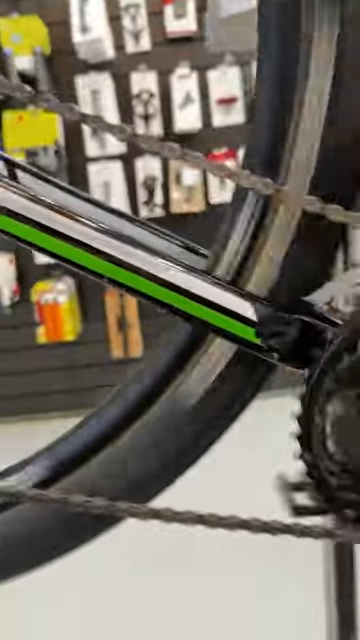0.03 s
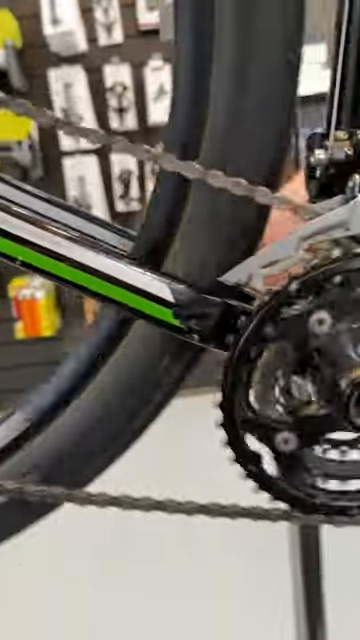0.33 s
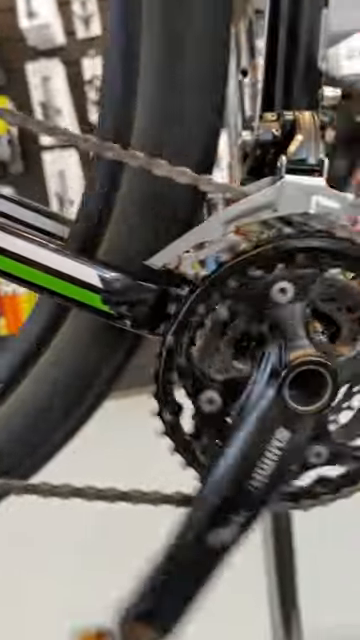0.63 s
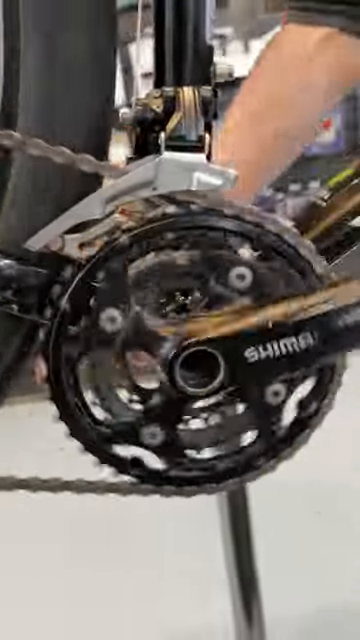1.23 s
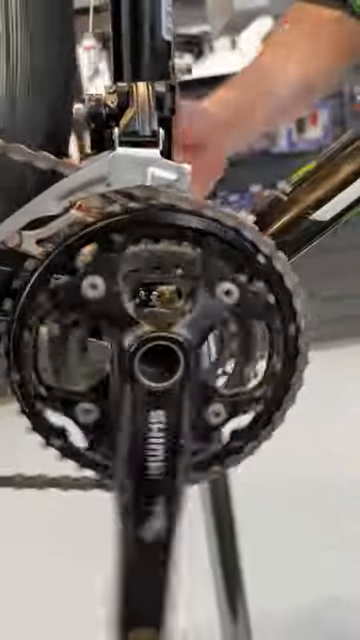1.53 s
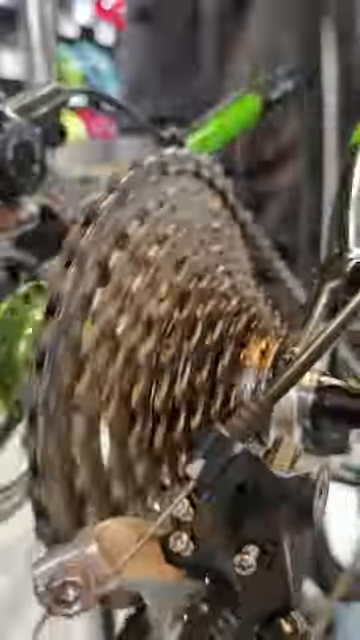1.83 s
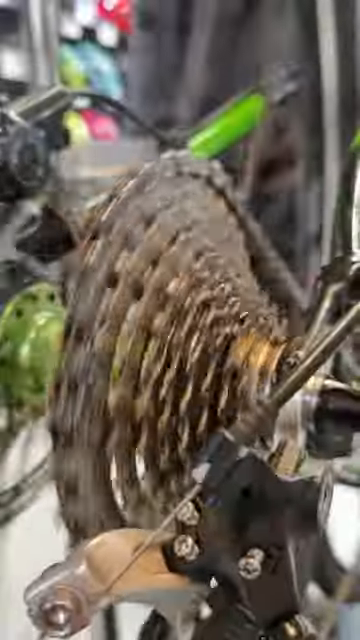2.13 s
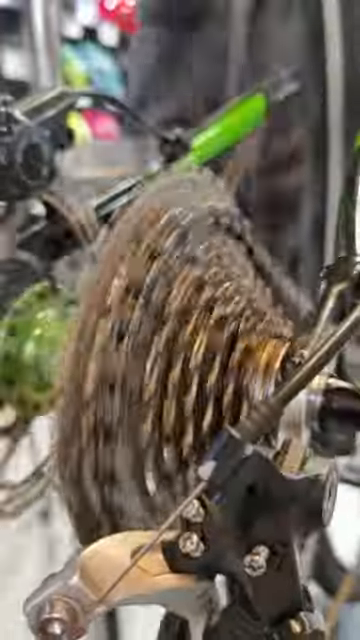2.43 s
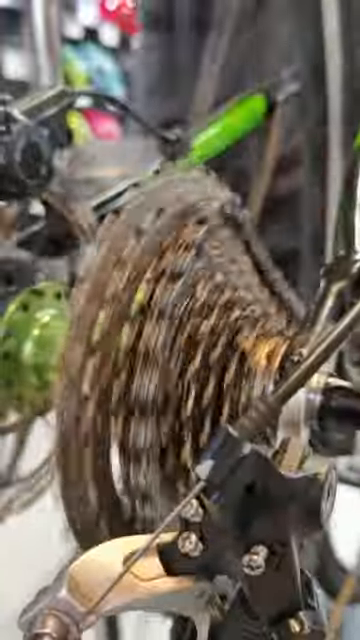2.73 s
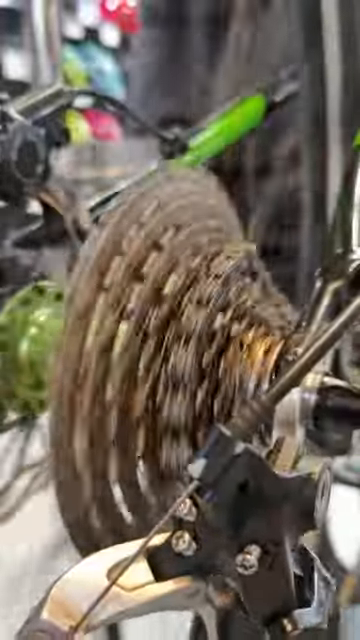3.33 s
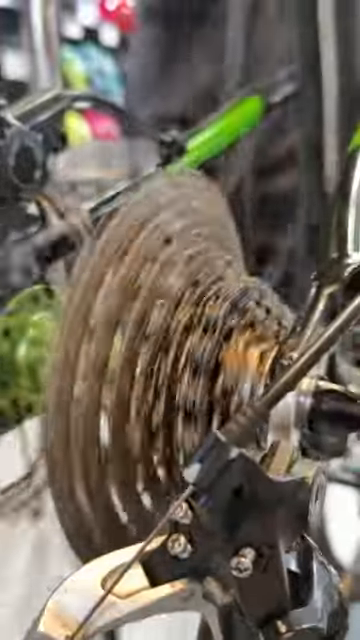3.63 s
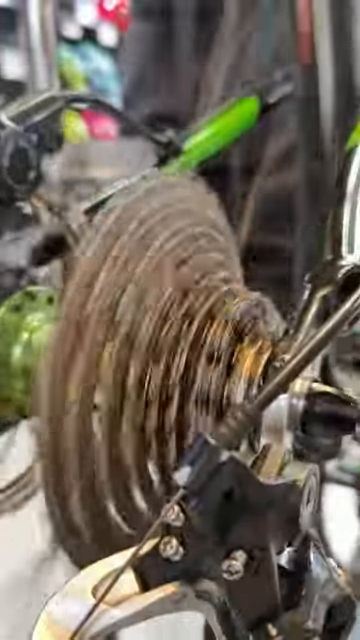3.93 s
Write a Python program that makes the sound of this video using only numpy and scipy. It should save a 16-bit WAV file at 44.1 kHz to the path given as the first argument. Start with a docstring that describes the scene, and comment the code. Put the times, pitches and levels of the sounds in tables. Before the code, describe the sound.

A bicycle chain runs close to the microphones in a quiet workshop. Until about 1.8 seconds its links tick rapidly and evenly onto the chainring, rattling over a low hum. The sound then switches to the rear sprockets, where the chain whirs, scrapes and clacks irregularly through gear shifts. Frame thuds and briefly ringing derailleur clangs join in, strongest around 2.9, 3.4 and 3.9 to 4 seconds.

```python
"""A workshop, with a bicycle pedalled on a repair stand and a stereo pair close to the drive.
Beside the chainring, links tick evenly onto the teeth and their rollers rattle over a low hum.
Then the microphones are at the cassette: the chain whirs, scrapes and clacks from sprocket to sprocket,
and each time it drops into mesh the frame thuds and the derailleur cage clangs and rings."""
import sys
import numpy as np
from scipy import signal
from scipy.fft import rfft, irfft
from scipy.io import wavfile
from scipy.ndimage import uniform_filter1d, map_coordinates

SR = 44100
rng = np.random.default_rng(int(sys.argv[2]) if len(sys.argv) > 2 else 0)


def bounce(signal):
    """Save signal as a 16-bit WAV file at the path given by the first command-line argument."""
    frames = np.transpose(np.atleast_2d(signal))
    limited = np.clip(frames, -1, 1)
    pcm = np.round(limited * 32767).astype(np.int16)
    wavfile.write(sys.argv[1], SR, pcm)


N = 176400
T = np.arange(N) / SR
AT_CASSETTE_S = 1.82  # the microphones change from chainring to cassette
SCRAPE_S, SCRAPE_DB = 0.0056, -8  # a plate slides before it strikes
STEEL_LOW_HZ, TOP_HZ = 2532, 15900

# Stiff links snap onto the chainring. Each row: time in seconds, extra level in dB.
STIFF_LINKS = [(.157, 10), (.277, 14), (.302, 9), (.63, 10), (1.395, 7)]
# How hard the links bite onto the chainring. Each row: time in seconds, gain in dB.
LINK_BITE = [(0, 3.5), (.3, -5.5), (.4, -1), (.82, 1.5), (.95, -2.5), (1.8, -3)]
# Pings of the rollers. Each row: pitch in Hz, starting level in dB, drift in dB per second.
ROLLER_PINGS = [(3230, -62, 7.5), (4170, -46.5, -2.5), (6850, -41, -7), (7300, -42, -4)]
# The chain slams onto a sprocket.
# Each row: time in seconds, level in dB, decay in seconds, brightness in dB per octave.
SHIFT_CLACKS = [(1.9343, -18, 0.0097, -1.5), (2.077, -19.5, 0.0026, -3.5), (2.2107, -18.5, 0.01, -2.5),
                (2.354, -17.5, 0.0032, -2), (2.379, -18.5, 0.014, 2), (2.483, -19.5, 0.0053, -3),
                (2.609, -20, 0.0088, -2), (2.763, -20.5, 0.0055, -1), (2.779, -15, 0.0023, 3.5),
                (2.861, -23, 0.012, -2.5), (2.917, -21.5, 0.0048, -8.5), (3.067, -23, 0.0043, -3.5),
                (3.2266, -24, 0.0036, -3), (3.370, -23, 0.0046, -2),  (3.3902, -13.5, 0.002, 3),
                (3.532, -25, 0.002, 0), (3.632, -27, 0.0057, -1), (3.677, -27, 0.008, 0),
                (3.803, -18, 0.0027, 0)]
# A plate only clips the tip of a tooth. Each row: time in seconds, level in dB.
TOOTH_TICKS = [(2.0245, -26.5), (2.106, -26), (2.2238, -14), (2.461, -18.5), (2.598, -21.5), (2.6503, -22),
               (2.686, -23.5), (3.127, -21.5), (3.233, -25), (3.595, -26.5), (3.6955, -20), (3.899, -21)]
# The chain drops into mesh. Each row: time in seconds, frame thud in dB, its pitch in Hz, clang in dB.
MESH_KNOCKS = [(1.94, -25.5, 255.3, -38), (2.076, -31, 190, -38), (2.352, -25.5, 190.2, -35.5),
               (2.417, -23, 251.3, -52), (2.779, -25, 260, -22), (2.882, -18.5, 270, -48),
               (2.917, -20, 320, -11), (2.947, -16.5, 306, -19.5), (2.971, -18.5, 330, -34.5),
               (3.39, -20.5, 269.6, -14.5), (3.769, -33.5, 346, -28.5), (3.902, -15, 264.7, -26),
               (3.991, -17.5, 256, -10)]
# Parts that ring on. Each row: pitch in Hz, level in dB, seconds to fall by 60 dB.
FRAME_MODES = [(150, -25.5, 0.98), (314.5, -17, 0.38), (353.8, -18.5, 0.44), (630.7, -18, 0.14)]
CAGE_MODES = [(1422, -26, 0.32), (2254, -12.5, 0.1), (2370, -17, 0.12), (2960, -18.5, 0.078)]
SPROCKET_MODES = [(6270, -35.5, 0.19)]
# The chain running over the cassette. Each row: time in seconds, level in dB.
WHIR_LEVEL = [(1.82, -38), (2.17, -43.5), (2.44, -35.5), (2.7, -40), (2.92, -35), (3.2, -35.5),
              (3.8, -40.5), (4, -31.5)]
# Hollow resonances of the frame. Each row: centre in Hz, width in Hz, gain in dB.
FRAME_DRONES = [(351.3, 27, -5), (737, 35, -16.5)]
# Hum of the turning drive. Each row: time in seconds, pitch in Hz, level in dB.
DRIVE_HUM = [(0, 70.57, -38), (0.701, 75.05, -38.5), (.88, 71.6, -46.5), (1.8, 73.4, -51.5),
             (3.098, 83.32, -42.5), (4, 77.5, -53)]

# Tone colours at the microphones. Each row: frequency in Hz, relative level in dB.
LINK_COLOUR = [(4200, -17), (5200, -12.5), (6900, -8), (8300, -8.5), (9700, -6), (14000, -22)]  # link on chainring tooth
ROLLER_COLOUR = [(1100, -4.5), (1410, 5.5), (1850, -7.5), (2450, 4), (4300, -6), (5150, -18), (6900, -2),
                 (16000, -16.5)]  # loose rollers
SNAP_COLOUR = [(3500, -10), (5200, -6), (7200, 0), (11000, 0), (16000, -4)]  # chain on sprocket tooth
BODY_COLOUR = [(200, 12), (1050, -4), (1500, 3), (3500, 10), (9000, -7)]  # sprocket body
CLANG_COLOUR = [(1450, -1), (1850, -4), (2300, 12.5), (2850, 13), (3900, -14.5)]  # derailleur cage
JOLT_COLOUR = [(320, -14.5), (520, 1), (700, 1.5), (1300, -34)]  # jolted derailleur
WHIR_COLOUR = [(80, -16), (270, 7), (460, -6.5), (700, -5.5), (1050, -22), (2450, -9.5), (5000, -22.5),
               (15000, -19.5)]  # running chain
ROOM_TONE_COLOUR = [(20, -1), (77, -15), (873, -28.5), (7520, -34.5), (16000, -67)]  # workshop
RUMBLE_COLOUR = [(60, -4.5), (300, -9), (700, -45.5)]  # repair stand
# The workshop's reverberation. Each row: frequency in Hz, seconds to fall by 60 dB.
ROOM_DECAY = [(500, 0.23), (7000, 0.41), (16000, 0.16)]
# How alike the two microphones hear diffuse sound. Each row: frequency in Hz, correlation from 0 to 1.
PAIR_LIKENESS = [(300, 0.95), (1200, 0.4), (2500, 0.13), (5000, 0.033)]


def chainring(links_per_s=41.8, speedup_per_s2=1.3, lead_s=.0007, tick_db=-39.5, tick_decay_s=.0013):
    """Close by the chainring, each link ticks onto a tooth and its roller pings and rattles."""
    link = np.arange(int(AT_CASSETTE_S * (links_per_s + speedup_per_s2 * AT_CASSETTE_S / 2)))
    link_rate = np.sqrt(links_per_s ** 2 + 2 * speedup_per_s2 * link)
    times = .0135 + (link_rate - links_per_s) / speedup_per_s2
    force_db = 2.2 * rng.uniform(-1, 1, len(link))
    for s, db in STIFF_LINKS:
        force_db[np.argmin(abs(times - s))] = db
    times += .0006 * rng.standard_normal(len(link))  # play in the chain
    force_db += np.interp(times, *np.transpose(LINK_BITE))
    ticks = strikes([(s, tick_db + db, tick_decay_s) for s, db in zip(times, force_db)], lead_s)
    pings = roller_pings(times, force_db, lead_s)
    rattle = roller_rattle(times, lead_s)
    return room(colour(steel(ticks * grit()), LINK_COLOUR) + steel(rattle) + pings)


def roller_pings(times, force_db, rise_s, detune=.012, spread_db=3.5, t60_s=.028):
    """Each struck roller rings briefly, at pitches and levels a little unlike the last."""
    out, t = np.zeros((2, N)), np.arange(SR // 16) / SR
    for s, blow_db in zip(times, force_db):
        modes = [(hz * (1 + detune * rng.standard_normal()),
                  db + drift * s + blow_db + spread_db * rng.standard_normal(), t60_s)
                 for hz, db, drift in ROLLER_PINGS]
        add(out, s, np.array([ring(modes, t), ring(modes, t)]) * (1 - np.exp(-t / rise_s)))
    return out


def roller_rattle(times, lead_s, within_s=.022, spread_db=8, decay_s=.0034):
    """Loose rollers bounce three times after each link; late bounces tend to be softer."""
    bounces = [(s + within_s * delay, spread_db * (strength - delay), decay_s)
               for s in times for delay, strength in rng.random((3, 2))]
    level = amp(-52.5 + 2.5 * T)
    return colour(strikes(bounces, lead_s) * level * noise(), ROLLER_COLOUR)


def shift_clacks(pivot_hz=8500, body_db=-9.5, body_ring_s=.006, size=8192):
    """Close by the cassette, the chain catches on ringing teeth; full blows sound the sprocket body."""
    snaps, grains = np.zeros((2, N)), grit()
    t = (np.arange(size) - size // 8) / SR
    octaves = np.log2(np.clip(np.fft.rfftfreq(size, 1 / SR), STEEL_LOW_HZ, TOP_HZ) / pivot_hz)
    ticks = [(s, db, .001, 1.5) for s, db in TOOTH_TICKS]  # short and bright
    scrape = amp(SCRAPE_DB) * np.exp(-abs(t) / SCRAPE_S)
    first_hit = amp(2) * np.exp(-abs(t) / .0005)
    for s, db, decay_s, tilt in SHIFT_CLACKS + ticks:
        force = np.where(t < 0, scrape, np.exp(-abs(t) / decay_s) + first_hit)
        offset = rng.integers(N - size)
        contact = force * grains[:, offset:offset + size]
        tilted = irfft(rfft(contact) * amp(db + tilt * octaves))
        add(snaps, s + t[0], steel(tilted))
    # Duller blows carry more body.
    blows = [(s, db + body_db - tilt, decay_s + body_ring_s) for s, db, decay_s, tilt in SHIFT_CLACKS]
    body = strikes(blows, SCRAPE_S) * noise()
    return room(colour(snaps, SNAP_COLOUR) + colour(body, BODY_COLOUR))


def mesh_knocks(rise_s=.0026, thud_s=.0069, clang_s=.0033, jolt_s=.011, lead_s=.0028, sings_at_s=2.955):
    """The chain falls into mesh: the frame thuds, the cage clangs, and once a freed sprocket sings."""
    rings, t = np.zeros((2, N)), np.arange(SR // 2) / SR
    attack = 1 - np.exp(-t / rise_s)
    for s, thud_db, hz, clang_db in MESH_KNOCKS:
        thud = 2 * np.sin(2 * np.pi * hz * t) * np.exp(-t / thud_s)
        add(rings, s, amp(thud_db) * attack * (thud + ring(FRAME_MODES, t, phase_scatter=0)))
        cage_centre = ring(CAGE_MODES, t)
        cage_sides = np.array([ring(CAGE_MODES, t), ring(CAGE_MODES, t)])
        add(rings, s, amp(clang_db) * (cage_centre + .5 * cage_sides))
    add(rings, sings_at_s, ring(SPROCKET_MODES, t) * attack)
    clang = strikes([(s, db, clang_s) for s, _, _, db in MESH_KNOCKS], lead_s)
    # The derailleur's jolt follows a blend of the thud and clang levels.
    jolt = strikes([(s, .56 * thud_db + .44 * clang_db - 7, jolt_s)
                    for s, thud_db, _, clang_db in MESH_KNOCKS], lead_s)
    return room(rings + colour(clang * noise(), CLANG_COLOUR) + colour(jolt * noise(), JOLT_COLOUR))


def chain_whir(spread_db=10.5, decay_s=.0031, steady_force=.25):
    """Rollers patter through the jockey wheels and over the cassette, and keep the frame droning."""
    times = T[1:][np.diff(np.floor(drive_cycles())) > 0]  # one roller per cycle
    patter = strikes([(s, spread_db * rng.uniform(-.5, 1), decay_s) for s in times], SCRAPE_S)
    level = amp(np.interp(T, *np.transpose(WHIR_LEVEL))) * (T > AT_CASSETTE_S)
    force = unit(patter + steady_force) * level * noise()
    drone = sum(amp(db) * resonate(force, hz, width_hz) for hz, width_hz, db in FRAME_DRONES)
    return room(colour(force, WHIR_COLOUR) + drone) / np.sqrt(2)


def drive_hum(rough_below_db=-43.5, shudders_per_s=32):
    """The drive shakes frame and stand: a low note and its octave, breaking into rumble when weak."""
    times, _, db = np.transpose(DRIVE_HUM)
    level_db = np.interp(T, times, db)
    rough_share = .076 + .5 * (level_db < rough_below_db)
    phase = 2 * np.pi * drive_cycles()
    out = 0
    for harmonic, gain in [(1, 1), (2, amp(-10 + .5 * T))]:
        shudder = [map_coordinates(points, [T * shudders_per_s], mode="mirror")
                   for points in rng.standard_normal((2, 256))]
        tone = np.sin(harmonic * phase)
        rumble = shudder[0] * tone + shudder[1] * np.cos(harmonic * phase)
        out += gain * (np.sqrt(1 - rough_share) * tone + np.sqrt(rough_share / 2) * rumble)
    return np.sqrt(2) * amp(level_db) * out


def workshop(tone_db=-48, rumble_db=-43.5, fade_db_per_s=7):
    """Behind the bicycle: steady room tone and the fading rumble of the stand."""
    room_tone = amp(tone_db) * colour(noise(), ROOM_TONE_COLOUR)
    rumble = amp(rumble_db - fade_db_per_s * T) * colour(noise(), RUMBLE_COLOUR)
    return room_tone + rumble


def room(x, early_db=-7.5, early_s=.006, tail_db=-7, size=32768):
    """Adds close reflections off the bicycle, then the tail of the workshop."""
    hz, frame_s, spectra = signal.stft(rng.standard_normal((2, size)), SR, nperseg=256)
    decay = amp(-60 * frame_s / at_hz(ROOM_DECAY, hz)[:, None])
    tail = signal.istft(spectra * decay, SR, nperseg=256)[1][:, :size]
    t = np.arange(size) / SR
    early = rng.standard_normal((2, size)) * (rng.random((2, size)) < .02) * np.exp(-t / early_s)
    reflections = (amp(tail_db) * unit(tail) + amp(early_db) * unit(early)) * (t > .002)
    return x + signal.fftconvolve(x, diffuse(reflections) / np.sqrt(size), axes=1)[:, :N]


def drive_cycles():
    """Cycles of the drive's vibration so far."""
    times, hz, _ = np.transpose(DRIVE_HUM)
    return np.cumsum(np.interp(T, times, hz)) / SR


def strikes(blows, lead_s):
    """Contact force of (seconds, dB, decay seconds) blows: a short scrape, the strike, a fast decay."""
    force, t = np.zeros(N), np.arange(-SR // 32, SR // 8) / SR
    scrape = amp(SCRAPE_DB) * np.exp(-abs(t) / lead_s)
    for s, db, decay_s in blows:
        add(force, s + t[0], amp(db) * np.where(t < 0, scrape, np.exp(-abs(t) / decay_s)))
    return force


def grit(lag_s=.00011, likeness=.56, grain_db=-1):
    """Dense tiny steel contacts that reach the left microphone first."""
    left, unrelated, sizes = rng.standard_normal((3, N))
    grains = amp(grain_db * np.clip(unit(uniform_filter1d(sizes, size=14)), -2, 2))
    right = likeness * np.roll(left, round(lag_s * SR)) + np.sqrt(1 - likeness ** 2) * unrelated
    return unit(np.array([left, right]) * grains)


def steel(x, t60_s=.023, ring_db=-1, count=50, size=2048):
    """Many short partials of plates and teeth ring on after each contact."""
    t = np.arange(size) / SR
    hz, phase = rng.uniform(STEEL_LOW_HZ, TOP_HZ, (count, 1)), rng.random((2, count, 1))
    partials = np.sin(2 * np.pi * (hz * t + phase)).sum(1) * amp(-60 * t / t60_s)
    ringing = signal.fftconvolve(x, unit(partials) / np.sqrt(size), axes=1)[:, :x.shape[1]]
    return (x + amp(ring_db) * ringing) / np.hypot(1, amp(ring_db))


def ring(modes, t, phase_scatter=1):
    """Dying partials of one struck part; scattered phases make each blow a little different."""
    return sum(amp(db - 60 * t / t60) * np.sin(2 * np.pi * (hz * t + phase_scatter * rng.random()))
               for hz, db, t60 in modes)


def resonate(x, hz, width_hz):
    """One resonance, with gain to make up for its narrow band."""
    b, a = signal.iirpeak(hz, hz / width_hz, SR)
    return signal.lfilter(b, a, signal.lfilter(b, a, x)) * np.sqrt(SR / width_hz / 2)


def colour(x, spectrum, size=4096):
    """Minimum-phase filter of unit energy with the given spectrum."""
    log_gain = np.log(amp(at_hz(spectrum, abs(np.fft.fftfreq(size, 1 / SR)))))
    taps = np.fft.ifft(np.exp(np.conj(signal.hilbert(log_gain)))).real[:size // 2]
    return signal.oaconvolve(x, taps[None] / np.linalg.norm(taps), axes=1)[:, :N]


def diffuse(x):
    """Makes two unrelated channels alike in the bass, as closely spaced microphones hear them."""
    left, unrelated = rfft(x)
    likeness = at_hz(PAIR_LIKENESS, np.fft.rfftfreq(x.shape[1], 1 / SR))
    return irfft([left, likeness * left + np.sqrt(1 - likeness ** 2) * unrelated], x.shape[1])


def noise():
    """Diffuse white noise at the pair."""
    return diffuse(rng.standard_normal((2, N)))


def add(mix, s, sound):
    """Mixes a sound in at s seconds."""
    start = round(s * SR)
    sound = sound[..., max(-start, 0):]
    part = mix[..., max(start, 0):][..., :sound.shape[-1]]
    part += sound[..., :part.shape[-1]]


def at_hz(table, hz):
    """Reads a table on a log-frequency axis."""
    table_hz, values = np.transpose(table)
    return np.interp(np.log(hz + 1), np.log(table_hz + 1), values)


def amp(db):
    """Decibels to gain."""
    return 10 ** (np.asarray(db) / 20)


def unit(x):
    """Scales to rms 1."""
    return x / np.sqrt(np.mean(x ** 2) + 1e-20)


def scene():
    """The drivetrain from close up, chainring then cassette, with the workshop behind."""
    return chainring() + drive_hum() + chain_whir() + shift_clacks() + mesh_knocks() + workshop()


def record(dry):
    """Both channels pass a steep low-pass at the top of the treble."""
    taps = signal.firwin(401, TOP_HZ, window=("kaiser", 7), fs=SR)
    return signal.oaconvolve(dry, taps[None], "same")


dry = scene()
out = record(dry)
bounce(out)
```